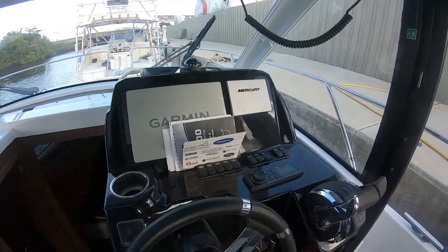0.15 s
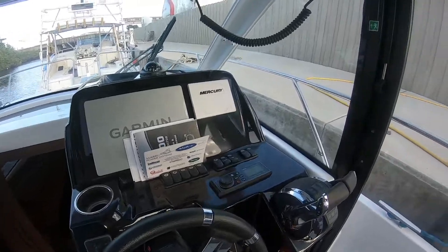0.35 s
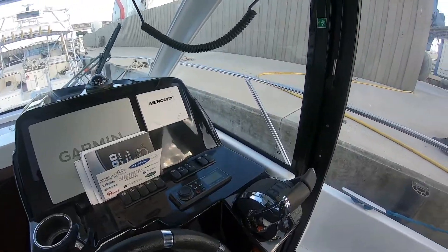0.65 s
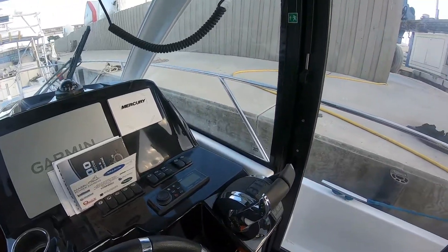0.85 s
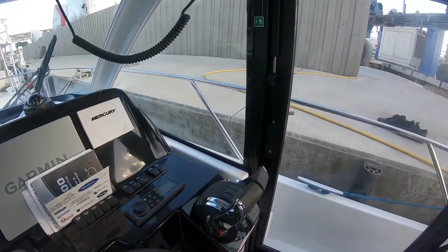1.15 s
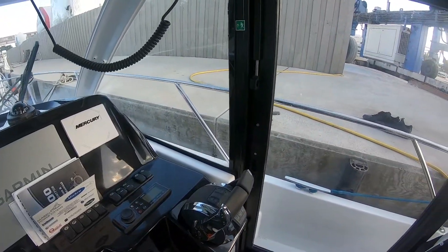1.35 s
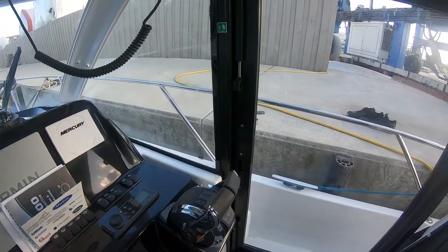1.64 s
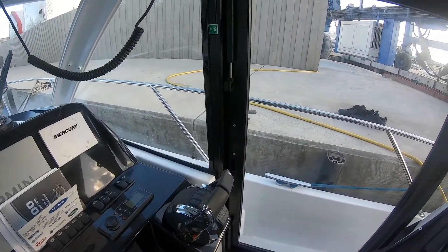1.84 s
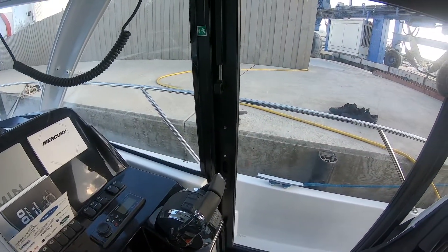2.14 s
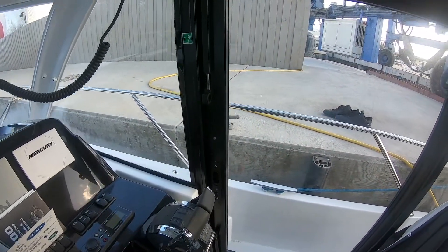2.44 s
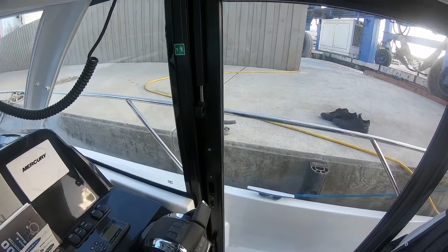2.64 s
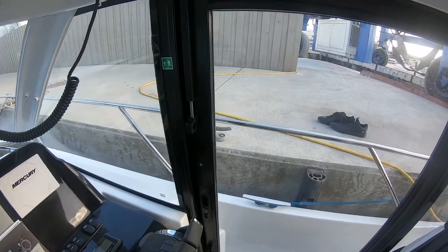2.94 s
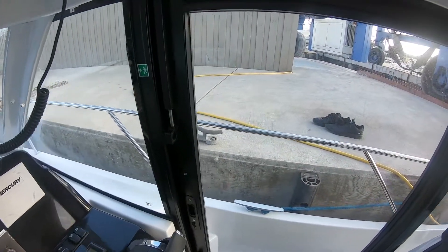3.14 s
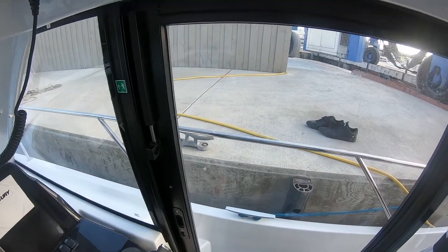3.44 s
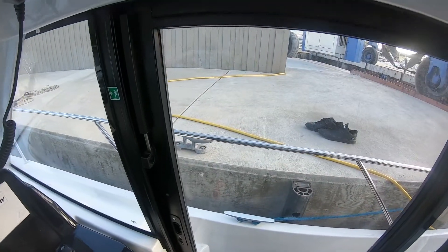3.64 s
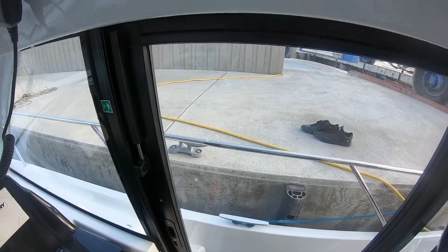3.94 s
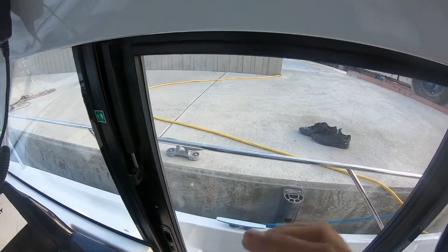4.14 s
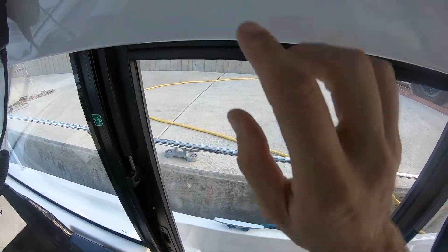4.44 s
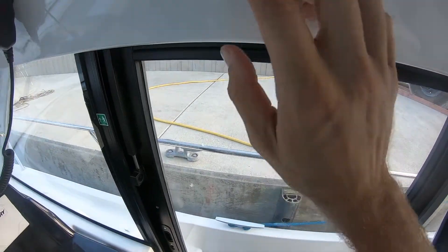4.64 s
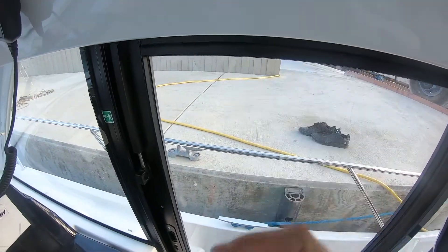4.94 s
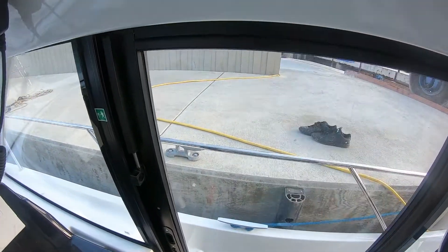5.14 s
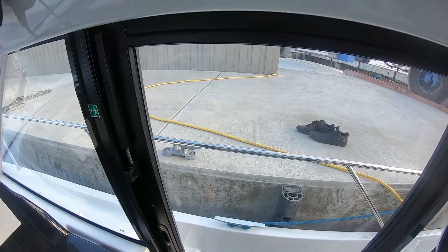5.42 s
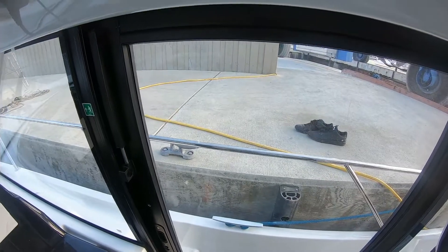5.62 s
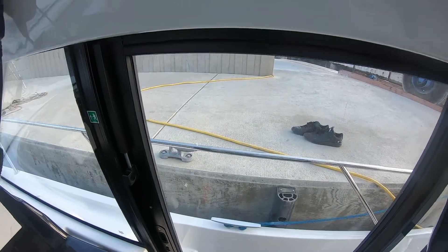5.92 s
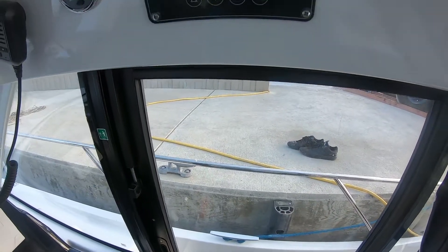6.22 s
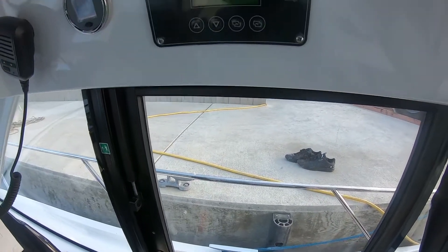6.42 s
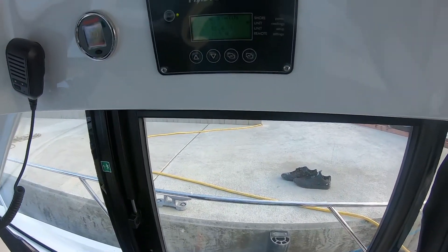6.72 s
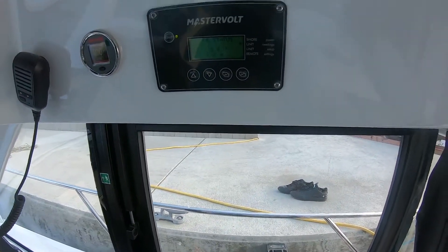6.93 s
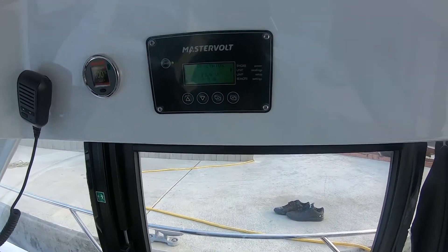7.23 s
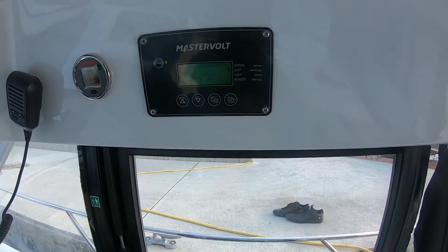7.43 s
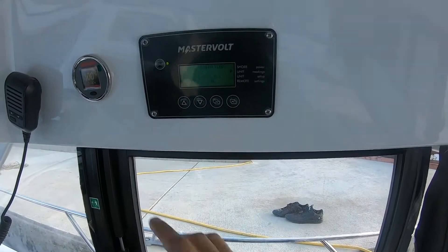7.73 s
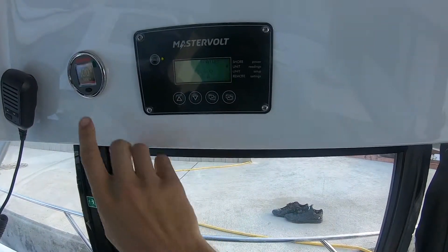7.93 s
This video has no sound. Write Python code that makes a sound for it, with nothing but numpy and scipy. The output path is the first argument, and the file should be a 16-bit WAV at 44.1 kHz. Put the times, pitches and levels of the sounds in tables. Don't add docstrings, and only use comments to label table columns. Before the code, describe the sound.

Steady low blower drone and soft vent hiss inside a boat cabin, slightly shifting as the microphone turns, with one scuff and faint clicks.

```python
import sys
import numpy as np
from scipy import signal
from scipy.fft import rfft, irfft
from scipy.io import wavfile

SR = 44100
rng = np.random.default_rng(int(sys.argv[2]) if len(sys.argv) > 2 else 0)


def to_linear_factor(level_db):
    exponent = np.asarray(level_db, float) / 20
    return 10 ** exponent


def generate_wav(sig):
    pcm = np.round(np.clip(np.atleast_2d(sig).T, -1, 1) * 32767).astype(np.int16)
    wavfile.write(sys.argv[1], SR, pcm)


N = 355975
T = np.arange(N) / SR
F = np.fft.rfftfreq(N, 1 / SR) + 1


def level(x, db):
    return x * to_linear_factor(db) / np.sqrt(np.mean(x ** 2))


def walk(rate):
    knots = rng.standard_normal(int(N / SR * 40) + 2)
    return np.interp(T * min(rate, 39), np.arange(len(knots)), knots)


def bump(centre_s, width_s):
    return np.exp(-((T - centre_s) / width_s) ** 2)


def spectrum(table, **ends):
    hz, db = np.transpose(table)
    return to_linear_factor(np.interp(np.log(F), np.log(hz), db, **ends))


def air(colour, gain_db, swell_db, flicker_db, ref_hz):
    noise = rfft(rng.standard_normal(N)) * spectrum(colour, right=-99)
    inside = (F > ref_hz[0]) & (F < ref_hz[1])
    noise /= np.sqrt(np.mean(irfft(noise * inside, N) ** 2))
    place = 3 * np.log2(F)
    swell = swell_db * walk(9)
    lowest_hz, highest_hz = colour[0][0], colour[-1][0]
    out = np.zeros(N)
    for k in np.arange(np.floor(3 * np.log2(lowest_hz)), 3 * np.log2(highest_hz) + 1):
        band = irfft(noise * np.clip(1 - abs(place - k), 0, 1), N)
        out += band * to_linear_factor(gain_db(2 ** (k / 3)) + swell + flicker_db * walk(7))
    return out


def tone(hz, wobble_db=0):
    turns = np.cumsum(hz) / SR + rng.random()
    return np.sqrt(2) * np.sin(2 * np.pi * turns) * to_linear_factor(wobble_db * walk(4))


# t/s, turned from the dash/0-1, close to the side pane/0-1, leaning on the hull/0-1
CAMERA = [
    (0, 0, 0.1, 0),
    (1.4, 0.12, 0, 0.64),
    (1.9, .05, 0.02, 1),
    (2.55, .15, 0.1, 1),
    (3.0, 1, 0.2, 1),
    (3.8, 0.76, 0.58, 0.66),
    (4.35, 0.87, 1, 0.9),
    (6.0, 0.96, .8, 0.73),
    (6.7, 1, 0.1, 1),
    (8.07, 1, .05, 0.95),
]


def camera():
    s, *columns = np.transpose(CAMERA)
    return [np.interp(T, s, column) for column in columns]


def panel_gain_db(turned):
    return 3.5 * turned


# f/Hz, level/dB per Hz
RUMBLE = [(4.7, -23), (8.0, -12), (48, -4), (112, 0.5), (308, -11), (400, -17), (507, -24.5), (565, -34.5),
          (716, -24.5), (816, -21), (1100, -32.5), (1310, -33), (1400, -48), (1820, -68), (3080, -120)]


def blowers():
    turned, pane, lean = camera()
    hull_db = 2 * lean
    panel_db = 3.05 + panel_gain_db(turned - 1)
    duct_db = 0.83 + 0.5 * turned + 2.3 * pane

    def gain_db(hz):
        if hz < 190:
            return -40 + hull_db
        if hz < 570:
            return -40 + panel_db
        return -40 + duct_db

    return air(RUMBLE, gain_db, swell_db=0.15, flicker_db=0.84, ref_hz=(45, 200))


# multiple of the shaft rate, level/dB
SHAFT_ORDERS = [(2, -46.5), (3, -49), (6, -54.5)]


def shafts():
    lean = camera()[2]
    shaft_hz, beat_hz, null_s = 35.82, 0.245, 3.8
    since_null = T - null_s
    turns = shaft_hz * since_null + rng.random() + 0.03 * walk(5)
    first = np.sin(2 * np.pi * turns)
    second = to_linear_factor(-3.5) * np.sin(2 * np.pi * (turns + beat_hz * since_null))
    out = to_linear_factor(-50.5 + 8 * lean + 2.4 * walk(4.04)) * np.sqrt(2) * (first - second)
    for k, db in SHAFT_ORDERS:
        fan_hz = shaft_hz + beat_hz * (1 - k % 2)
        out += to_linear_factor(db) * tone(np.full(N, k * fan_hz), 2.1)
    return out


# f/Hz, level/dB, wander/Hz
HUMS = [(58.4, -54.5, 1.13), (123.4, -48, 1.18), (130.2, -49.5, 1.204), (163.4, -52.5, 0.582),
        (255.2, -57.5, 4.92), (291.5, -54.5, 5.006), (328.8, -63.5, 3.98), (380.3, -62.5, 4.0),
        (90.6, -52, 2.81)]


def hums():
    turned = camera()[0]
    out = sum(to_linear_factor(db) * tone(hz + wander * walk(12), 3.3) for hz, db, wander in HUMS)
    return out * to_linear_factor(panel_gain_db(turned - turned.mean()))


def compressor():
    lost = np.clip((T - 0.54) / 0.2, 0, 1)
    back = np.clip((T - 5.87) / 1.3, 0, 1) ** 0.5
    db = -58.5 - 10.5 * (lost - back) + 6 * bump(1.95, 0.37)
    return to_linear_factor(db) * tone(1344.8 + 1.22 * walk(3), 1.0)


# f/Hz, level/dB
INVERTER = [(7000, -80), (12667, -96), (12956, -99), (13243, -83), (13529, -85), (13817, -78), (14966, -87),
            (15547, -89)]


def inverter():
    return sum(to_linear_factor(db - 1.0) * tone(hz + 3 * walk(6.1), 4.5) for hz, db in INVERTER)


# f/Hz, level/dB per Hz
HISS = [(500, -33), (1000, -9), (1500, 1), (2400, -0.5), (3200, -0.5), (3700, -5), (4300, -4), (5000, -8),
        (6200, -7.5), (7000, -10), (7800, -10), (8600, -13), (11000, -23), (16000, -23)]


def grilles():
    turned, pane, _ = camera()
    jet_db = 4.5 * bump(3.45, 0.55)
    glass_db = 1.2 - 3.5 * pane + 0.3 * jet_db
    bright_db = 1.3 - 2 * turned + 0.35 * jet_db
    top_db = 0.9 - 2.5 * turned + jet_db

    def gain_db(hz):
        if hz > 9800:
            return -51 + top_db
        if hz > 3600:
            return -51 + bright_db
        if 1900 < hz < 2700:
            return -51 + 0.59 * glass_db
        return -51 - 0.15 * glass_db

    return air(HISS, gain_db, swell_db=0.38, flicker_db=0.63, ref_hz=(1400, 3500))


# t/s, length/s, f/Hz, level/dB
LOUVRE = [
    (7.27, .2, 1825, -59),
    (5.8, .45, 3230, -63),
    (4.7, .6, 1720, -61),
    (1.6, 1.2, 4300, -67),
]


def whistles():
    return sum(to_linear_factor(db) * bump(s, length) * tone(hz + 25 * walk(30), 3.6) for s, length, hz, db in LOUVRE)


# lag/s, drift/s, level/dB
PANES = [(.0042, 0.00043, -15), (.011, 0.000572, -15), (.023, .001, -19)]


def panes(x):
    heard = x.copy()
    for lag, drift, db in PANES:
        heard += to_linear_factor(db) * np.interp(T - lag - drift * walk(0.7), T, x)
    return level(heard, 0) * x.std()


# t/s, level/dB, rise/s, t60/s, tilt/dB per octave
SCUFFS = [
    (3.027, -41.5, .014, .22, 2.2),
    (.19, -54, .09, .35, 4.5),
    (3.7, -56, .1, .4, 5.0),
    (2.03, -55, .02, .2, 4.0),
    (1.15, -57, .1, .6, 5.0),
]


def cloth():
    noise = rfft(rng.standard_normal(N)) * spectrum(HISS)
    out = np.zeros(N)
    for s, db, rise, t60, tilt in SCUFFS:
        t = np.clip(T - s, 0, None)
        puff = level(irfft(noise * to_linear_factor(tilt * np.log2(F / 2000)), N), db)
        fade = 1000 ** (-np.clip(t - rise, 0, None) / t60)
        out += puff * np.clip(t / rise, 0, 1) * fade
    return out


# t/s, peak level/dB, sharpness/dB
TICKS = [
    (5.6132, -41, 7.0),
    (5.6200, -46, -6.0),
    (7.2612, -44, -14.0),
    (7.2662, -35.5, -2.0),
    (7.2845, -45, -10.0),
]
# f/Hz, level/dB, lag/s, length/s
TICK_MODES = [(2950, 0, 0, .0014), (3800, -1, .0014, .0011), (4600, -6, .0022, .0007),
              (7200, -13, .002, .0011), (9100, -13, .0002, .0009)]


def ticks():
    out = np.zeros(N)
    for s, db, sharp_db in TICKS:
        for hz, mode_db, lag, length in TICK_MODES:
            t = T - s - lag
            tilt_db = sharp_db * np.log2(hz / 3000) / 2
            ring = np.sin(2 * np.pi * hz * t) * np.exp(-np.clip(t / length, -9, 9) ** 2)
            out += to_linear_factor(db + mode_db + tilt_db) * ring
    return out


def scene():
    machinery = blowers() + shafts() + hums() + compressor() + inverter()
    vents = panes(grilles() + whistles())
    return (machinery + vents + cloth() + ticks())[None]


def low_pass(x):
    return signal.sosfilt(signal.butter(12, 15730, fs=SR, output="sos"), x)


# f/Hz, width/Hz, level/dB
HOUSING = [(561, 26, -9), (1117, 146, -9.5), (8520, 380, -4), (9790, 450, -10)]
# f/Hz, level/dB
MICROPHONE = [(3, -26), (14, -3), (24, 0), (12700, -0.5), (13600, -7.5), (13850, -10), (14000, -15),
              (15600, -16)]


def record(dry):
    dips_db = sum(db / (1 + (2 * (F - hz) / width) ** 2) for hz, width, db in HOUSING)
    heard = irfft(rfft(dry) * to_linear_factor(dips_db) * spectrum(MICROPHONE), N)
    return low_pass(heard)


dry = scene()
out = record(dry)
generate_wav(out)
```